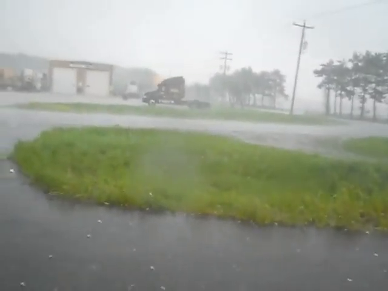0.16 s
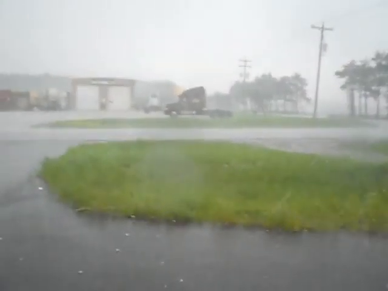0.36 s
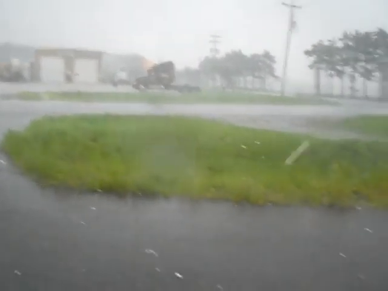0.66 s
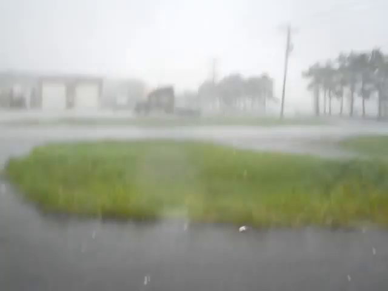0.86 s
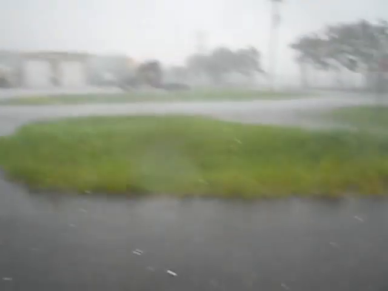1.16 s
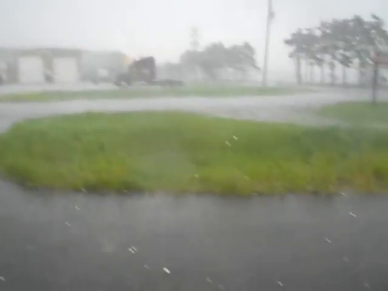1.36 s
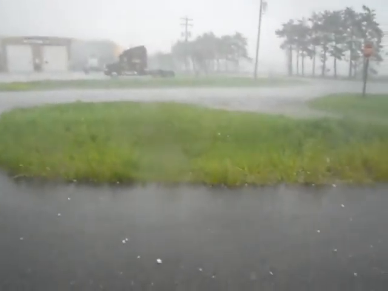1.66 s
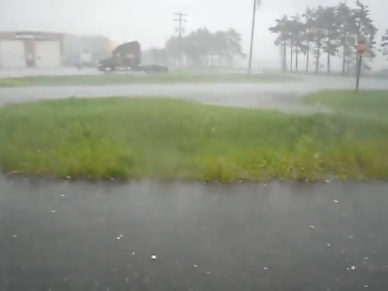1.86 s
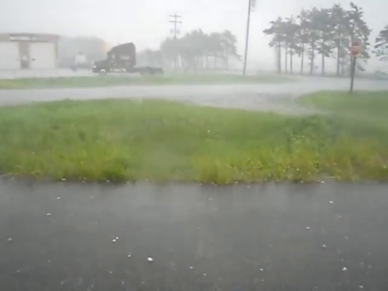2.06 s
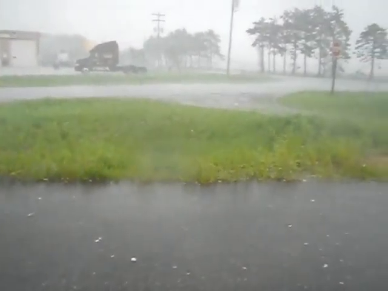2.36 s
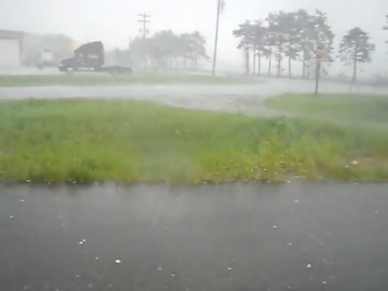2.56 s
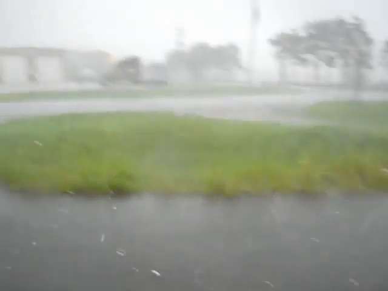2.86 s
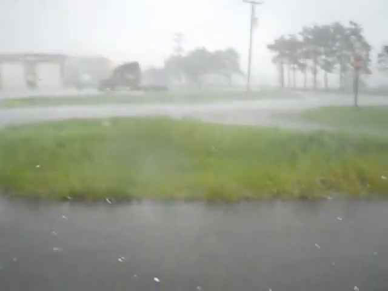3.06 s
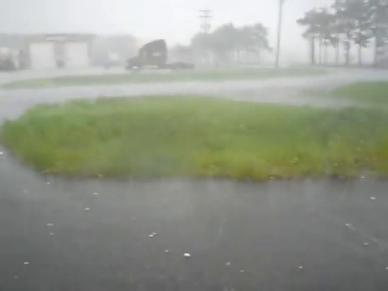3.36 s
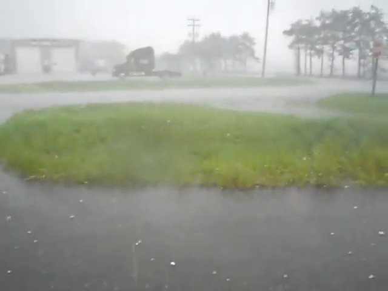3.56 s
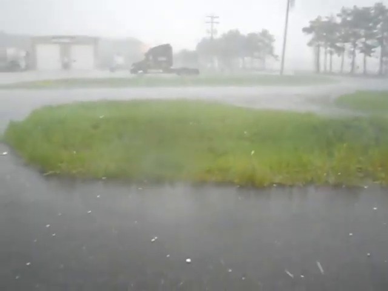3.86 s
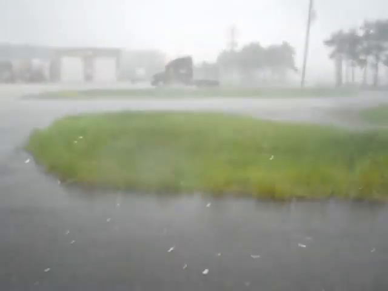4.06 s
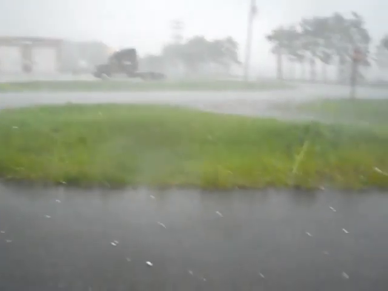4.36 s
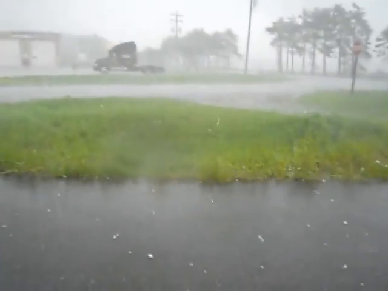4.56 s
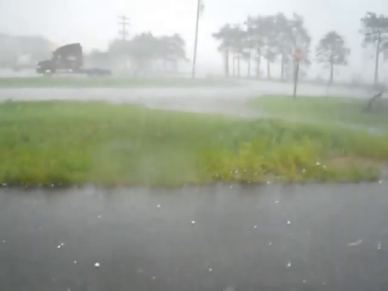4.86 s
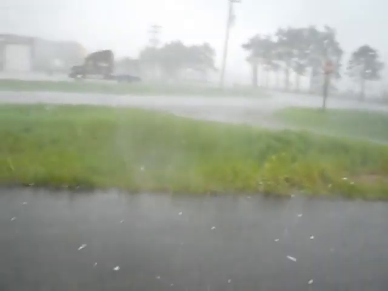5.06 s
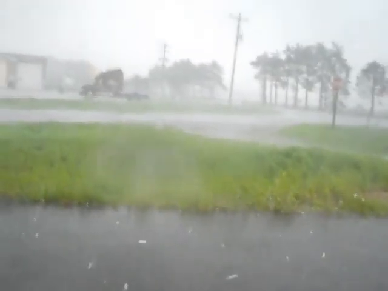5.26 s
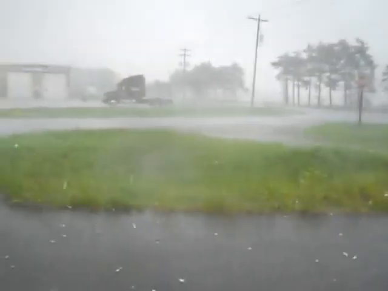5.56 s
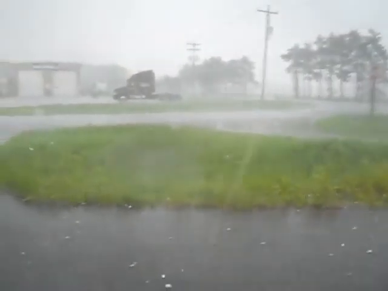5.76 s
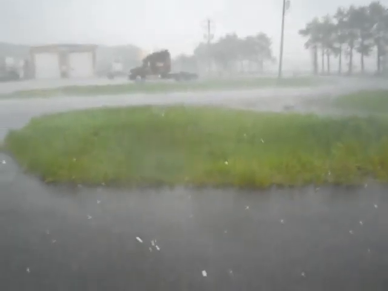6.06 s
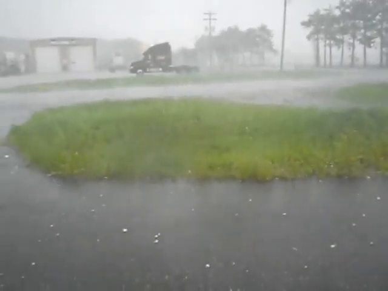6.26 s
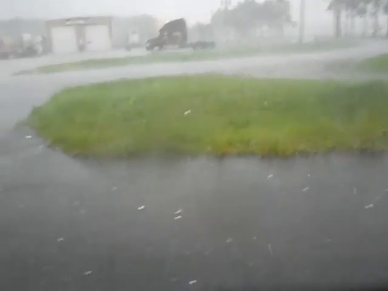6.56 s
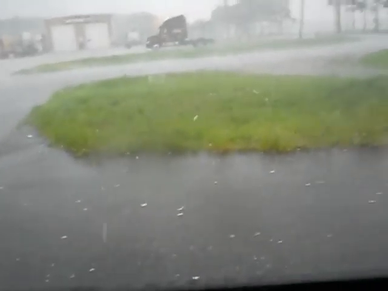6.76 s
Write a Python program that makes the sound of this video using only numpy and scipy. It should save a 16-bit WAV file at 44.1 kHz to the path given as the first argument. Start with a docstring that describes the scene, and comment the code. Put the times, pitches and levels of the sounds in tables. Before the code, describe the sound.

Inside a parked vehicle, heavy rain hisses and drums on the roof as hail clicks all around. The sound begins subdued and opens up. Early big stones crack and boom on the panels; another blow near one second briefly pulls the level down. A low gust rumbles, then drumming swells in waves with dense clicks, and hard knocks return toward the end. The microphone is in the cabin.

```python
"""Hail and heavy rain on a parked vehicle, heard from inside.
It opens with the level held down and recovering, in drumming, hissing rain, clicking hail and uneven wind.
The first big stones soon crack and ring on the bodywork and make its panels boom; more strike to the end.
A strong gust rumbles after the first second, then sheets of rain swell and pass, with a few thin pings.
An overload at full gain makes the recorder's gain control turn the scene down for about a second;
blows during that time do not trip it again."""
import sys
import numpy as np
from scipy import signal
from scipy.fft import rfft, irfft
from scipy.io import wavfile
from scipy.ndimage import uniform_filter1d

SR = 44100
rng = np.random.default_rng(int(sys.argv[2]) if len(sys.argv) > 2 else 0)


def unload_audio(sound):
    """Save the sound as a 16-bit wav file, at the path given as the first command line argument."""
    columns = np.transpose(np.atleast_2d(sound))
    # keep every value between -1 and 1, then stretch to whole-number steps
    steps = np.round(np.clip(columns, -1, 1) * 32767)
    wavfile.write(sys.argv[1], SR, steps.astype(np.int16))


N = 305172
TIME = np.arange(N) / SR  # s

# slow rise and fall of the downpour outside: time_s, hiss_db
DOWNPOUR = [(0, -39.5), (1.6, -41.5), (1.9, -43.5), (2.5, -36.5), (3.0, -38), (3.9, -38.5), (4.6, -43),
            (6.9, -39)]
# sheets of rain sweeping over, as bell-shaped swells: peak_s, drumming_db, hiss_db, half_length_s
RAIN_SHEETS = [(0.48, -38.5, -40.5, 0.17), (1.436, -36.5, -40, 0.31), (2.014, -31.5, -39.5, 0.03),
               (2.378, -34, -62, 0.054), (2.538, -27, -40, 0.033), (2.65, -31.5, -49, 0.085),
               (2.75, -31.5, -32.5, 0.14), (3.147, -26.5, -39.5, 0.048), (3.256, -34, -35, .07),
               (3.523, -32.5, -39, 0.062), (3.76, -27.5, -31.5, 0.085), (4.078, -30, -53, 0.045),
               (4.837, -31.5, -54, 0.028), (5.257, -28, -36.5, 0.12), (5.572, -28.5, -35, 0.049),
               (5.686, -38, -31, 0.049), (6.09, -35.5, -36.5, 0.03), (6.456, -32, -42.5, 0.15)]
# spectrum of the drumming on the roof: frequency_hz, relative_db
DRUMMING_SPECTRUM = [(70, -16.5), (120, 1.5), (260, 2), (460, 1.5), (720, -3), (1100, -3), (1600, -9.5),
                     (2400, -25), (4000, -39.5)]
# spectrum of the rain's hiss: frequency_hz, relative_db
HISS_SPECTRUM = [(900, -14), (1700, -8.5), (2700, 3), (3600, -3.5), (4800, -2), (6500, -4.5), (8500, -6),
                 (10500, -13)]
# the nearest hailstones: start_s, click_peak_db, pitch_hz
NEAR_STONES = [(0.1898, -6.5, 3520), (0.4884, -3, 1646), (0.5736, -4, 2290), (0.583, -9, 3360),
               (0.642, -10.5, 2450), (0.809, 6, 3280), (0.8375, -6, 2780), (0.9557, -11.5, 2600),
               (1.3416, -3.5, 3430), (1.7802, -4, 3000), (1.8878, -6.5, 2150), (2.0216, -10.5, 1780),
               (2.052, -5, 3500), (2.2022, -5.5, 3020), (2.513, 3, 4070), (2.521, -4, 3500),
               (2.6265, -6.5, 3500), (2.7163, -5, 2040), (2.767, 1.5, 3150), (2.7813, 2.5, 3650),
               (2.9703, -3.5, 4160), (3.0975, -9, 1900), (3.1085, -2.5, 2600), (3.1695, -4.5, 4050),
               (3.201, .5, 2640), (3.2258, -6.5, 3000), (3.2814, -4.5, 3030), (3.295, 1.5, 2010),
               (3.4074, -8, 1440), (3.4834, -4.5, 3700), (3.5757, -2.5, 1630), (3.6819, -1.5, 2340),
               (3.9282, 3, 2360), (4.015, -6.5, 3050), (4.0457, -6.5, 2660), (4.1164, -2.5, 2100),
               (4.1892, -8.5, 5000), (4.3534, -7.5, 2680), (4.4402, -11, 2120), (4.7627, -9, 2020),
               (4.7837, -8, 2480), (4.8848, -4, 5630), (5.0, -9.5, 3260), (5.1113, -5.5, 3740),
               (5.2489, -2, 3830), (5.3254, 3, 4160), (5.5217, -4, 3840), (5.7825, 8.5, 2230),
               (5.8999, -7.5, 2380), (6.061, -7.5, 2740), (6.4257, 3.5, 2560), (6.7645, -4, 2600),
               (6.8323, 8.5, 2710)]
# spectrum that colours hailstones and single ice grains: frequency_hz, relative_db
CLICK_SPECTRUM = [(200, 2.5), (600, 2.5), (1100, 2.5), (3000, -1.5), (5500, -2), (7500, -4), (10500, -5.5)]
# big stones on the bodywork: start_s, crack_db, crack_edge_hz, ring_hz, ring_peak_db, ring_t60_s,
# boom_peak_db, boom_centre_hz, boom_rise_s, boom_length (a factor on decay times)
BIG_STONES = [ (0.2368, 1.5, 1930, 978, 0.5, 0.094, 6, 370, 0.01, 0.71),
              (0.2601, -24, 616, 380, 10.5, 0.069, 2.5, 220, 0.0084, 0.76),
              (1.018, 0, 1590, 1023, -6.5, 0.19, 9, 288, 0.0055, 0.95),
              (1.439, -40, 1000, 448, -35, 0.04, -11.5, 220, 0.0026, 0.25),
              (2.1699, -24, 1900, 653, -33, 0.06, -13, 69.4, 0.017, 1.2),
              (2.2943, -21, 3020, 2740, -10.5, 0.011, -20, 300, 0.0031, 0.36),
              (3.799, -31.5, 1200, 473, -18.5, 0.035, -16.5, 380, 0.0025, 0.32),
              (3.864, -22.5, 1810, 1180, -25, .05, -17, 420, 0.0011, 0.7),
              (4.4459, 2.5, 5650, 2845, 11, 0.014, 1, 330, 0.0023, 0.33),
              (5.2659, -23, 2650, 1520, -18, 0.016, -39, 600, 0.002, 0.3),
              (5.3408, -14, 3740, 1130, -6, 0.026, -41, 400, 0.0027, 0.47),
              (6.401, 4.5, 5450, 973, 10, 0.017, 7, 170, 0.0015, 0.57),
              (6.768, -21.5, 1480, 1140, -12.5, 0.023, -12, 115, 0.0052, 0.86)]
# spectrum of a crack before its treble is softened: frequency_hz, relative_db
CRACK_SPECTRUM = [(100, -3), (400, -0.5), (700, 0.5), (1100, 4), (1800, -3), (3000, 2.5), (10000, -4.5)]
# modes of the roof and cabin, before each blow scales their decay: pitch_hz, relative_db, t60_s
PANEL_MODES = [(38.7, 3.5, 0.34), (61.5, -5.5, 0.11), (102, -2.5, 0.21), (148.2, -2, 0.26),
               (177.9, -4.5, 0.44), (196.7, -6.5, 0.31), (246, -5.5, 0.37), (335, -1, 0.15),
               (386.6, 6, 0.11), (433, 0, 0.096), (519, -4.5, 0.21), (570, -12, 0.092), (770, -16, 0.34),
               (960, -22, 0.07), (1190, -9, 0.11), (1670, -17, 0.072)]
# thin pings of ice on metal: start_s, peak_db, pitch_hz, t60_s
METAL_PINGS = [(3.25, -35, 5400, .25), (3.805, -30, 4520, 0.16), (5.65, -16.5, 4450, 0.063)]
# gusts that shake the cabin: peak_s, level_db, half_length_s
WIND_GUSTS = [(0.1, -36, 0.2), (1.0, -42.5, .1), (1.426, -24, 0.15), (3.115, -33, 0.079), (4.95, -39, 0.38),
              (6.85, -31, 0.088)]
# spectrum of the wind's rumble: frequency_hz, relative_db
WIND_SPECTRUM = [(12, -2.5), (30, 5), (55, -0.5), (90, 1.5), (150, -3), (400, -48)]

# steady drumming between the sheets of rain, and steady wind round the cabin
DRUM_DB, WIND_DB = -36.5, -44.5
# stones further off: mean rate, typical peak over the steady hiss, scatter of level
STRAY_PER_S, STRAY_OVER_HISS_DB, STRAY_SPREAD_DB = 20, 23.5, 2.5
# their typical pitch and its scatter
STRAY_HZ, STRAY_SPREAD_OCTAVES = 3130, 0.62
# level that trips the gain control, and top edge of the recorder's band
OVERLOAD_DB, TOP_HZ = -8, 10950
# low self-noise of the recorder, which the gain control does not turn down
SELF_NOISE_DB = -53


def undb(db):
    """Decibels to gain."""
    return 10 ** (np.asarray(db) / 20)


def unit(x):
    """Scale to rms 1."""
    return x / np.sqrt(np.mean(x ** 2))


def read_db(spectrum, hz):
    """A spectrum's level at some frequencies, joined by straight lines over log frequency."""
    f, db = np.transpose(spectrum)
    return np.interp(np.log(np.maximum(hz, 1)), np.log(f), db)


def colour(x, spectrum, size=2048):
    """Causal minimum-phase filter with the given spectrum, so that attacks stay sharp."""
    log_gain = np.log(undb(read_db(spectrum, np.fft.rfftfreq(size, 1 / SR))))
    cepstrum = irfft(log_gain)
    # folding the cepstrum onto positive times makes the filter causal
    cepstrum[1:size // 2] *= 2
    cepstrum[size // 2 + 1:] = 0
    response = irfft(np.exp(rfft(cepstrum)))
    return signal.fftconvolve(x, response)[:len(x)]


def band(x, hz, ratio, order=2):
    """Band-pass from hz / ratio to hz * ratio."""
    ratio = max(ratio, 1.01)
    edges_hz = [hz / ratio, min(hz * ratio, .45 * SR)]
    return signal.sosfilt(signal.butter(order, edges_hz, "band", fs=SR, output="sos"), x)


def fade(t, t60):
    """Free decay, 60 dB down after t60."""
    return np.exp(-np.log(1000) * t / t60)


def onset(t, rise_s):
    """Smooth build-up from silence over about rise_s."""
    return 1 - np.exp(-(t / rise_s) ** 2)


def walk(rate):
    """Random levels, a new one rate times a second, joined by ramps; rms 1."""
    k = max(int(SR / rate), 1)
    steps = np.repeat(rng.standard_normal(N // k + 1), k)
    return unit(uniform_filter1d(steps, k)[:N])


def swells(steady_db, rows):
    """Level in dB of a steady bed with bell-shaped swells (peak_s, level_db, half_length_s) on top."""
    power = undb(steady_db) ** 2
    for s, db, half_s in rows:
        power = power + undb(db) ** 2 * np.exp(-((TIME - s) / half_s) ** 2)
    return 10 * np.log10(power)


def add(out, s, x):
    """Mix a sound in at time s."""
    i = max(int(s * SR), 0)
    out[i:i + len(x)] += x[:max(len(out) - i, 0)]


def shower():
    """Levels of drumming and hiss: each sheet of rain lifts both above the downpour."""
    s, drum_db, hiss_db, half_s = np.transpose(RAIN_SHEETS)
    downpour_db = np.interp(TIME, *np.transpose(DOWNPOUR))
    return swells(DRUM_DB, zip(s, drum_db, half_s)), swells(downpour_db, zip(s, hiss_db, half_s))


def impacts(rate, spread_db, range_db):
    """Random impulses, many weak and few strong, up to a largest size."""
    falls = rng.random(N) < rate / SR
    size_db = np.minimum(spread_db * rng.exponential(size=N), range_db)
    return falls * undb(size_db) * rng.choice([-1, 1], N)


def patter(rate, spread_db, range_db, count=7):
    """Small impacts in several broad bands, each click dying within milliseconds."""
    t = np.arange(1024) / SR
    out = 0
    for hz in np.geomspace(1400, 8000, count):
        tap = signal.unit_impulse(len(t)) + .07 * rng.standard_normal(len(t)) * fade(t, .013)
        clicks = signal.fftconvolve(impacts(rate / count, spread_db, range_db), tap)[:N]
        # tilts the balance gently towards the lower bands
        out = out + band(clicks, hz, 1.45, order=1) / hz ** .25
    return unit(out)


def rain(drum_db, hiss_db):
    """Drops drum on the roof; outside they merge into a hiss, from which the nearer ice grains stand out."""
    roof = unit(impacts(rate=400, spread_db=3.0, range_db=9.5)) + 0.97 * rng.standard_normal(N)
    drum = unit(colour(roof, DRUMMING_SPECTRUM)) * undb(drum_db + 1.4 * walk(35))
    wash = rng.standard_normal(N) * undb(3.0 + 1.0 * walk(73))
    spray = patter(rate=1500, spread_db=4.5, range_db=24) * undb(-4.0)
    hiss = unit(colour(wash + spray, HISS_SPECTRUM)) * undb(hiss_db)
    # the nearer grains are few enough to be heard one by one
    grains = unit(colour(patter(rate=80, spread_db=6, range_db=11), CLICK_SPECTRUM))
    return drum + hiss + grains * undb(hiss_db - 0.25)


def hailstones(stones, size=2048):
    """Hard ice clicks once, in a band of its own, and leaves a brief ring in what it hit."""
    out, t = np.zeros(N), np.arange(size) / SR
    tap = signal.unit_impulse(size)
    for s, db, hz in stones:
        # the contact time sets the band of the click; the ice splintering adds a little of everything
        click = colour(band(tap, hz, 2.28) + 0.29 * tap, CLICK_SPECTRUM)
        click = click / np.abs(click).max()
        noise = band(rng.standard_normal(size), hz, 1.9, order=1)
        ring = unit(colour(noise, CLICK_SPECTRUM)) * (fade(t, .012) + .17 * fade(t, .042))
        add(out, s, undb(db) * (click + undb(-18.5) * ring))
    return out


def stray_stones(count=400):
    """Stones further off (start_s, peak_db, pitch_hz), louder while the downpour is heavier."""
    when, chance = rng.random((count, 2)).T
    level, pitch = np.clip(rng.standard_normal((count, 2)).T, -2, 2)
    s = (np.arange(count) + when) / count * N / SR
    hiss_db = np.interp(s, *np.transpose(DOWNPOUR))
    db = hiss_db + STRAY_OVER_HISS_DB + STRAY_SPREAD_DB * level
    hz = STRAY_HZ * 2 ** (STRAY_SPREAD_OCTAVES * pitch)
    # thin the candidates at random to the mean rate
    return np.column_stack([s, db, hz])[chance < STRAY_PER_S * N / SR / count]


def crack(t, edge_hz, count=14):
    """A stone shatters on a panel: noise bands for its dense bending waves, whose treble dies first."""
    out, softness = 0, 1500 / edge_hz
    for hz in np.geomspace(120, 10500, count):
        weight = undb(read_db(CRACK_SPECTRUM, hz)) * np.sqrt(hz / (1 + (hz / edge_hz) ** 4))
        # a softer contact builds up more slowly and rings for longer
        t60 = 0.11 * (1000 / hz) ** 0.34 * softness ** 0.62
        out = out + weight * unit(band(rng.standard_normal(len(t)), hz, 1.162)) * fade(t, t60)
    out = out * onset(t, 0.0057 * softness)
    # rms 1 over the first 10 ms
    return out / np.sqrt(np.mean(out[t < .01] ** 2))


def boom(t, centre_hz, rise_s, length):
    """Roof modes swell as the blow spreads and the cabin blurs their decay; its place picks the modes."""
    out = 0
    for hz, db, t60 in PANEL_MODES:
        # modes far from the centre speak less
        reach = 1 / (1 + (np.log2(hz / centre_hz) / 1.44) ** 2)
        mode = np.sin(2 * np.pi * (hz * t + rng.random())) * fade(t, 0.95 * t60 * length)
        # the second half of the noise leaves the filter's start-up out
        noise = unit(band(rng.standard_normal(2 * len(t)), hz, 1.242))[len(t):]
        blur = noise * fade(t, 0.3 * length)
        out = out + reach * undb(db) * (mode + undb(-11.0) * blur)
    out = out * onset(t, rise_s)
    return out / np.abs(out).max()


def knocks():
    """Each big stone gives a crack, a ring of the spot that it hits, and a boom of the whole panel."""
    out, t = np.zeros(N), np.arange(SR // 2) / SR
    for (s, crack_db, edge_hz, ring_hz, ring_db, ring_t60,
         boom_db, centre_hz, rise_s, length) in BIG_STONES:
        ring = np.sin(2 * np.pi * ring_hz * t) * fade(t, ring_t60) * onset(t, 0.0028)
        ring = ring / np.abs(ring).max()
        knock = undb(crack_db) * crack(t, edge_hz) + undb(ring_db) * ring
        add(out, s, knock + undb(boom_db) * boom(t, centre_hz, rise_s, length))
    return out


def pings():
    """Now and then a stone sets off a thin ring: a decaying sine that wavers in pitch."""
    out, t = np.zeros(N), np.arange(SR // 4) / SR
    for s, db, hz, t60 in METAL_PINGS:
        cycles = np.cumsum(hz * (1 + .045 * walk(700)[:len(t)])) / SR
        add(out, s, undb(db) * np.sin(2 * np.pi * cycles) * fade(t, t60))
    return out


def wind():
    """Gusts shake the cabin with an uneven rumble: low noise under wandering levels."""
    rumble = unit(colour(rng.standard_normal(N), WIND_SPECTRUM, size=8192))
    return rumble * undb(swells(WIND_DB, WIND_GUSTS) + 0.51 * walk(5))


def scene():
    """Rain, hailstones near and far, knocks, pings and wind, at one microphone."""
    hail = hailstones(NEAR_STONES) + hailstones(stray_stones())
    return (rain(*shower()) + hail + knocks() + pings() + wind())[None]


def gain_control(x, cut_db, attack_s, hold_s, release_s, start_age_s, ahead_s):
    """An overload at full gain turns it down for a set time, slightly ahead; it starts already down."""
    keep = np.exp(-1 / (.008 * SR))  # power is averaged over about 8 ms
    power = signal.lfilter([1 - keep], [1, -keep], x ** 2)
    trips = [-start_age_s]
    for s in TIME[power > undb(OVERLOAD_DB) ** 2]:
        # overloads during hold or release trip nothing
        if s > trips[-1] + hold_s + release_s:
            trips.append(s - ahead_s)
    shape_s = np.cumsum([0, attack_s, hold_s, release_s])
    total_cut_db = sum(np.interp(TIME - s, shape_s, [0, cut_db, cut_db, 0]) for s in trips)
    return x * undb(-total_cut_db)


def record(dry):
    """A steep top cut, gain control, low self-noise, rounding of the tallest peaks, and the cut again."""
    top = signal.butter(28, TOP_HZ, fs=SR, output="sos")
    held = gain_control(signal.sosfilt(top, dry[0]), cut_db=15, attack_s=0.0016, hold_s=.66,
                        release_s=0.35, start_age_s=0.38, ahead_s=0.00059)
    held = held + undb(SELF_NOISE_DB) * unit(band(rng.standard_normal(N), 40, 2.7))
    rounded = .86 * held / (1 + (held / .86) ** 6) ** (1 / 6)  # peaks bend towards .86
    return signal.sosfilt(top, rounded)[None]


dry = scene()
out = record(dry)
unload_audio(out)
```